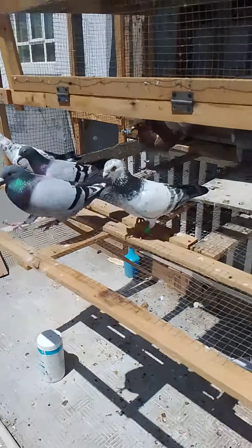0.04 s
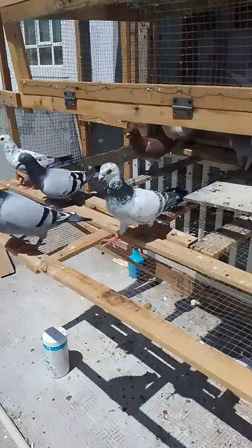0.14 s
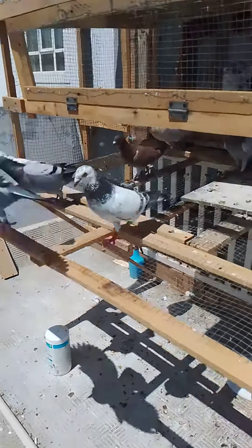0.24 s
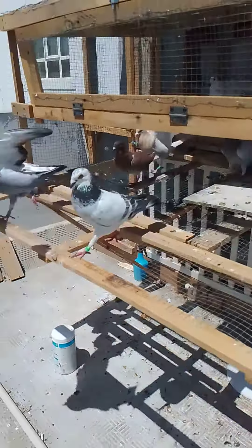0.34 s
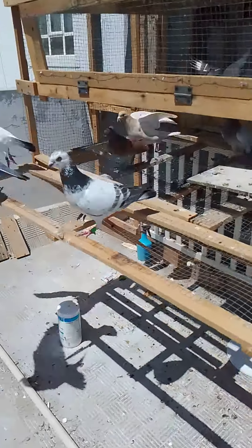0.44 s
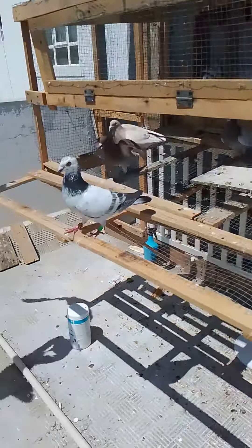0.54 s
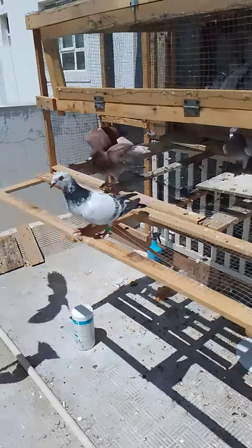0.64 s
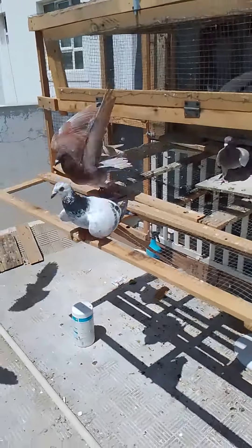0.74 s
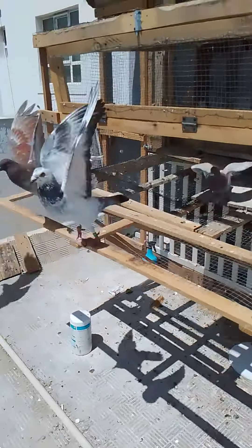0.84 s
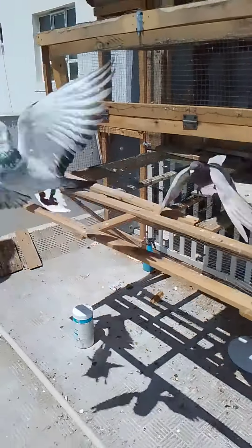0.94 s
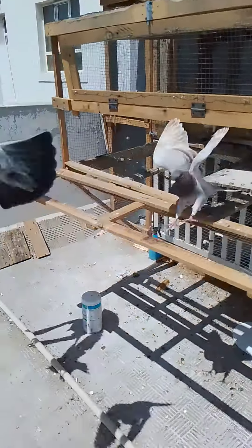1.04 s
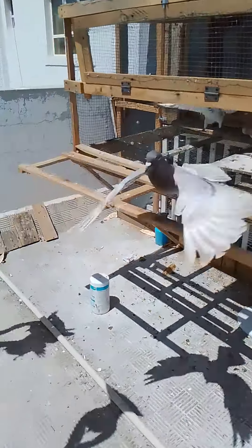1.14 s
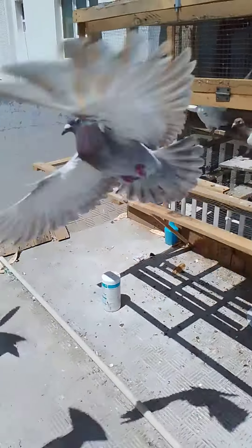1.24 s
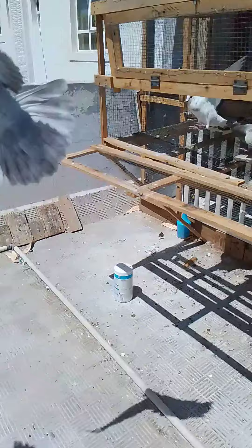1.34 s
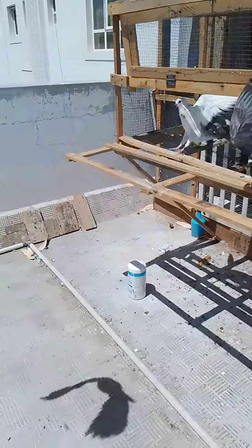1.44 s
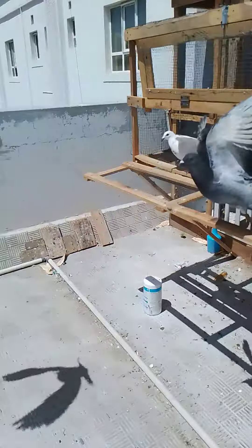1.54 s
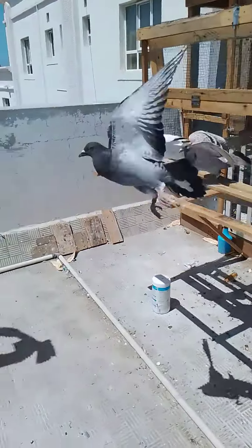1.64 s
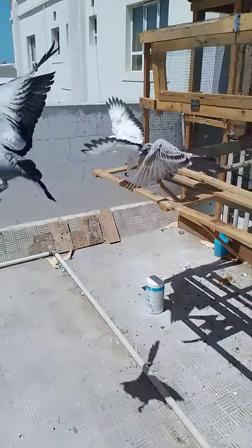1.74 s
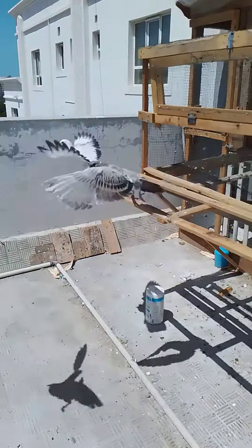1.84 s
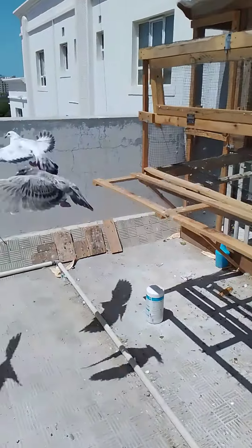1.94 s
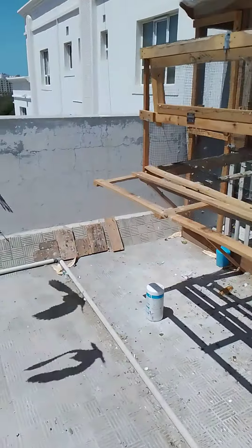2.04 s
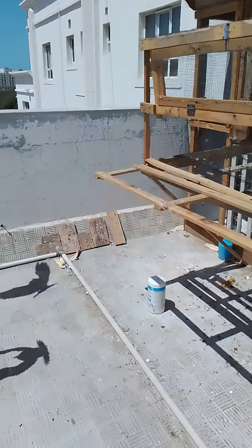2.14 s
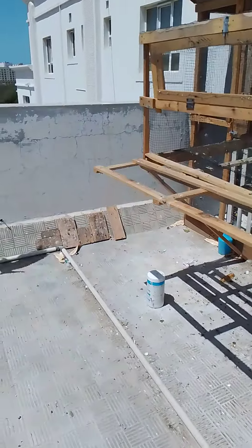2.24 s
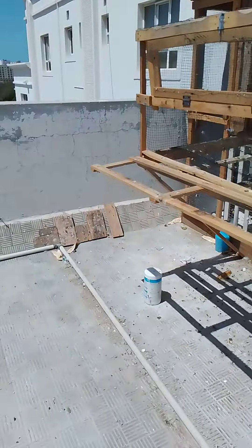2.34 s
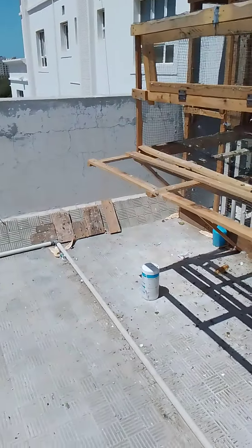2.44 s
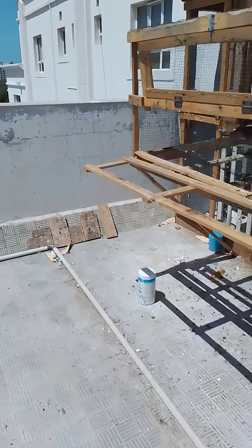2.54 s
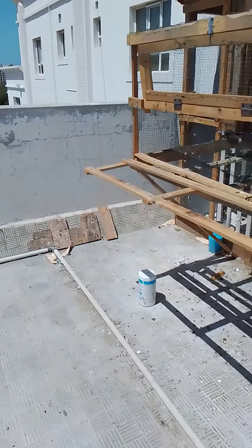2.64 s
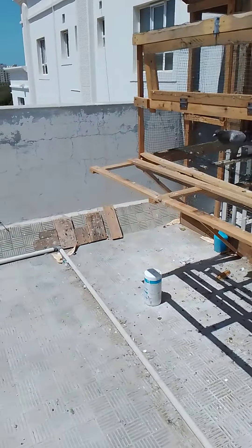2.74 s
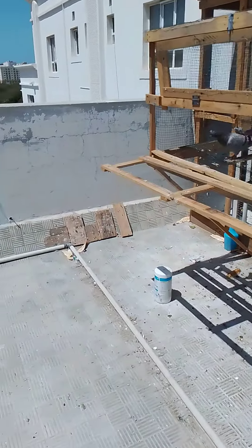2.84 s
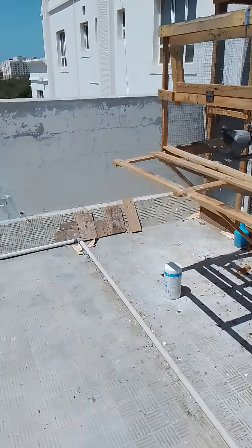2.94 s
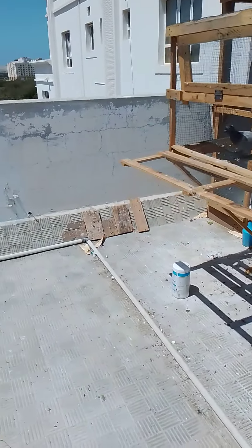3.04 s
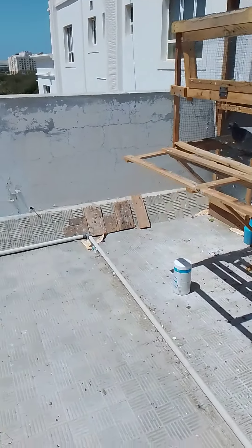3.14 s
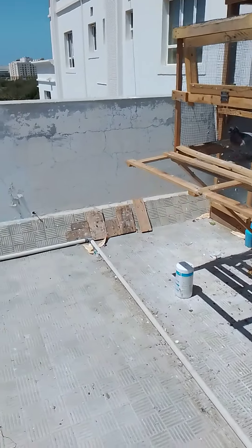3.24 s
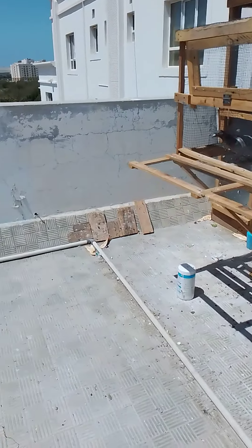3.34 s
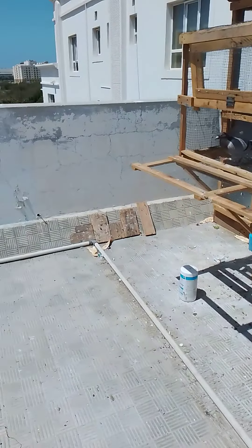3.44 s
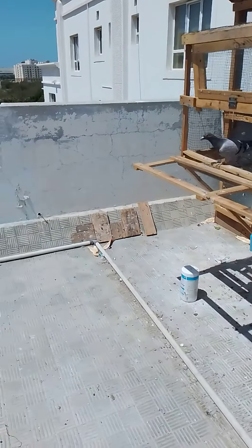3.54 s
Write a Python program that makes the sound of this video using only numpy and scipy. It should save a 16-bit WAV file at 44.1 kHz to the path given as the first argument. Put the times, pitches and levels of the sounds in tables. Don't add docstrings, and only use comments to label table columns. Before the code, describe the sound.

Wing flaps of pigeons taking off, crackling feather snaps over a swelling airy rush that fades

```python
import sys
import numpy as np
from scipy import signal
from scipy.fft import rfft, irfft
from scipy.io import wavfile

SR = 44100
rng = np.random.default_rng(int(sys.argv[2]) if len(sys.argv) > 2 else 0)


def int16_out(signal):
    q = np.round(np.clip(np.atleast_2d(signal).T, -1, 1) * 32767)
    wavfile.write(sys.argv[1], SR, q.astype(np.int16))


def volts_from_db(level):
    exponent = np.asarray(level, float) / 20
    return 10 ** exponent


N = 156555

# [Hz, dB per Hz]
RUMBLE_SPECTRUM = [(12, -29), (20, -34), (59, -6.5), (76, -6), (122, -10), (156, -16.5), (165, -83),
                   (210, -66), (360, -120)]
# [Hz, dB per Hz]
TOWN_SPECTRUM = [(100, -75), (170, -9.5), (312, 0), (596, -9.5), (749, -1.5), (1940, -1.5), (4300, -16),
                 (4800, -28), (16000, -44)]
# t/s, peak level/dB, f/Hz
FEATHER_FLICKS = [(0.0169, -36, 8230), (0.4668, -29, 9180), (0.6744, -40, 10300), (0.7367, -28, 8880),
                  (0.8989, -38, 10200), (1.132, -24.5, 8300), (1.2094, -26.5, 9370), (1.343, -29, 8050),
                  (1.377, -28, 10000), (1.496, -27, 8240), (1.7686, -33, 9210), (2.177, -39, 8580),
                  (2.5344, -31, 9060), (2.5716, -39, 7600), (2.7095, -29, 8290), (3.0284, -61, 8660)]
# t/s, peak level/dB, f/Hz
FEATHER_SLAPS = [(0.572, -20, 2570), (0.588, -20, 1760), (1.001, -25, 2600), (1.139, -18, 2550),
                 (1.214, -14.5, 2000), (1.224, -17, 1890), (1.267, -34, 1070), (1.389, -20, 1320),
                 (1.417, -14.5, 2650), (1.429, -14, 1040), (1.488, -21, 1900), (1.518, -18, 2000),
                 (1.632, -24, 1280), (1.661, -19, 1250), (1.799, -17, 2110), (1.847, -19.5, 1840),
                 (2.009, -22, 1790), (2.099, -34, 2230)]
# t/s, peak level/dB, f/Hz, length/s
THROBS = [(0.457, -28, 282, 0.057), (0.519, -5.5, 370, 0.01), (0.658, -18.5, 335, 0.017),
          (0.797, -16.5, 330, 0.012), (0.847, -15, 370, 0.01), (0.9, -20.5, 304, 0.048),
          (0.965, -18, 307, 0.022), (1.235, -19.5, 422, 0.034), (1.419, -22, 439, 0.04),
          (1.554, -22, 553, 0.014), (1.68, -16.5, 398, 0.012), (1.741, -21, 337, 0.021),
          (1.841, -20.5, 353.6, 0.088), (1.918, -27.5, 390, 0.042), (2.079, -26.5, 322, 0.2),
          (2.167, -27.5, 416, 0.085), (2.252, -28.5, 450, 0.087), (2.291, -21.5, 343, 0.048),
          (2.377, -19.5, 416, 0.027), (2.504, -20, 307, 0.03), (2.547, -25, 320, 0.045),
          (2.801, -27.5, 366, 0.075), (3.135, -23.5, 335, 0.075), (3.163, -24.5, 340, 0.029)]
# t/s, peak level/dB, f/Hz
DOWNSTROKES = [(0.743, -29, 1094), (0.893, -16.5, 1268), (1.136, -40, 1170), (1.21, -33, 1150),
               (1.27, -25, 1090), (1.321, -21, 867), (1.346, -22, 620), (1.39, -20, 1270),
               (1.419, -21.5, 1107), (1.452, -17.5, 591), (1.471, -22, 1217), (1.507, -17.5, 1014),
               (1.618, -20.5, 967), (1.654, -26, 1220), (1.89, -23.5, 1170)]
# t/s, level/dB, nearness (bass gain)/dB
FLOCK_PATH = [(0.0, -41.5, -0.5), (0.24, -38.5, -5), (0.6, -30.5, 1), (1.4, -29.5, -0.5), (1.5, -29, 0),
              (2.39, -37, 1.5), (2.51, -39.5, 3.5), (2.87, -40.5, 1.5), (3.07, -39, 2), (3.29, -41.5, 6),
              (3.55, -47.5, 8)]
# [Hz, dB per Hz]
WING_SPECTRUM = [(100, -75), (170, -7), (295, 1), (749, -6.5), (996, -1), (1400, -4), (2840, -4),
                 (7480, -22.5), (16000, -28)]
# t/s, peak level/dB, ring f/Hz, brightness/dB, tail t60/s
WING_CLAPS = [(0.066, -29, 1860, -22, 0.24), (0.164, -24, 3220, -21, 0.19),
              (0.2074, -15.5, 3240, -40, 0.15), (0.2737, -28, 3200, -36, 0.073),
              (0.2797, -17.5, 4000, -25, 0.059), (0.3494, -20, 980, -50, 0.12),
              (0.4401, -17, 2800, -30.5, 0.067), (0.5104, -5, 2760, -10, 0.18),
              (0.5214, -15, 2060, -33, 0.17), (0.6185, -15.5, 1040, -30, 0.036),
              (0.6255, -20, 2920, -11, 0.089), (0.629, -11, 2900, -30, 0.046), (0.7938, -8, 3860, 2, 0.054),
              (0.7985, -14, 3140, -11, 0.18), (0.849, -21.5, 2160, -24, 0.25),
              (0.8892, -15, 1330, -41, 0.074), (0.9014, -14, 2050, -34, 0.15),
              (0.923, -12.5, 2330, -11, 0.068), (0.9657, -12, 1950, -24, 0.23),
              (0.9889, -15, 2950, -17, 0.078), (1.107, -15, 1980, -24, 0.088),
              (1.1613, -17.5, 1900, -36, 0.076), (1.2414, -14.5, 2750, -40, 0.21),
              (1.3206, -19, 1870, -39, 0.17),
              (1.4493, -15, 2730, -1, 0.077), (1.5547, -13.5, 2880, -6, 0.3),
                 (1.584, -14.5, 1010, -14, 0.039), (1.6257, -15.5, 930, -17, 0.22),
                 (1.893, -14, 1570, -22, 0.23), (1.928, -14, 2050, -12, 0.051),
                 (1.986, -16.5, 2300, -11, 0.33), (2.0493, -16, 2880, -23, .04),
                 (2.0805, -15, 2780, -51, 0.11), (2.2843, -15, 3680, -5, 0.16),
                 (2.3892, -9.5, 3830, -7, 0.1), (2.394, -9, 2200, -16, 0.2),
                 (2.4463, -22, 1550, -52, 0.087), (2.511, -8.5, 2770, -17, 0.12),
                 (2.7162, -12.5, 2460, -18, 0.14), (2.829, -22, 1210, -18, 0.36),
                 (2.9422, -16.5, 1570, -16, 0.2), (3.0564, -27, 1480, -18, 0.21),
                 (3.18, -30, 837, -30, 0.068), (3.2195, -19, 2450, -17, 0.12),
                 (3.254, -16.5, 1680, -25, 0.13), (3.44, -32, 3280, -18, 0.08)]
# t/s, peak level/dB, ring f/Hz, brightness/dB, tail t60/s
WING_CRACKS = [
    (0.4137, -8.5, 1650, -26, 0.19),
    (0.5245, -9, 960, -32, 0.041),
    (0.9475, -8.5, 1070, -36, 0.06),
    (0.9807, -8.5, 2980, -24, 0.06),
    (1.4635, -7.5, 3160, 9, 0.065),
    (1.684, -10, 1110, -20, 0.072),
    (1.7731, -13, 2960, -19, 0.36),
    (2.0754, -11.5, 2920, -50, .06),
    (2.2362, -15, 2800, -27, 0.1),
    (2.713, -7.5, 1400, -30, 0.027),
]
# [Hz, dB per Hz]
CLAP_SPECTRUM = [(100, -31), (170, -25), (585, -8), (872, -1), (1350, -3.5), (1760, -3.5), (2780, 0),
                 (9040, -20.5), (16000, -30.5)]
# delay t/s, level/dB
LOFT_ECHOES = [
    (.0041, -11.5),
    (0.014, -9),
    (0.03, -33),
]
# f/Hz, gain/dB
MIC_RIPPLE = [(3300, -2), (4350, -2), (4700, -5.5), (6000, -6), (7500, -11), (9500, -4.5), (13000, -16.5),
              (15500, -7)]


def rms_one(x):
    return x / np.sqrt(np.mean(x ** 2) + 1e-20)


def colour(x, points):
    size = 8192
    f = np.maximum(np.arange(size // 2 + 1) * SR / size, 1)
    hz, db = np.transpose(points)
    level = np.interp(np.log(f), np.log(hz), db)
    cepstrum = irfft(np.log(volts_from_db(level)))
    cepstrum[1:size // 2] *= 2
    cepstrum[size // 2 + 1:] = 0
    return signal.fftconvolve(x, irfft(np.exp(rfft(cepstrum))))[:len(x)]


def drift(rate):
    r = np.exp(-80 * np.pi * rate / SR)
    slow = signal.lfilter([1], [1, -2 * r, r * r], rng.standard_normal(N // 40 + 2002))[2000:]
    return np.interp(np.arange(N) / 40, np.arange(len(slow)), rms_one(slow - slow.mean()))


def peak(x, hz, width_hz):
    r = np.exp(-np.pi * width_hz / SR)
    feedback = [1, -2 * r * np.cos(2 * np.pi * hz / SR), r * r]
    return signal.lfilter([(1 - r * r) / 2, 0, (r * r - 1) / 2], feedback, x)


def add(out, s, x):
    i = int(s * SR)
    out[i:i + len(x)] += x[:len(out) - i]


def patchy(spectrum, patchy_db, beat_db=0):
    edges = 150 * 2 ** np.arange(0, 7.1, .5)
    white = rng.standard_normal((2, N))
    out = np.zeros(N)
    for k, (lo, hi) in enumerate(zip(edges, edges[1:])):
        band = signal.butter(2, [lo, hi], "band", fs=SR, output="sos")
        beat_share = -0.5 + 2.2 * (k / 13) ** 2
        gain_db = patchy_db * drift(15.2) + beat_db * beat_share
        out += volts_from_db(gain_db) * signal.sosfilt(band, white[k % 2])
    return rms_one(colour(out, spectrum))


def rumble(flock_db):
    level_db = -56.5 + 0.58 * (flock_db - flock_db.mean()) + 1.6 * drift(16)
    return rms_one(colour(rng.standard_normal(N), RUMBLE_SPECTRUM)) * volts_from_db(level_db)


def town_hum():
    return volts_from_db(-44) * patchy(TOWN_SPECTRUM, patchy_db=2.0)


def squeak():
    start_s, level_db, hz, t60_s, rise_s = 1.734, -15, 3560, .06, .003
    out, t = np.zeros(N), np.arange(SR // 8) / SR
    tone = np.sin(2 * np.pi * hz * t) + .8 * np.sin(2 * np.pi * .92 * hz * t)
    add(out, start_s, volts_from_db(level_db - 60 * t / t60_s) * (1 - np.exp(-t / rise_s)) * tone)
    return out


def feather_bursts(rows, gain_db, t60_s, q):
    out, t = np.zeros(N), np.arange(SR // 10) / SR
    for s, db, hz in rows:
        burst = rng.standard_normal(len(t)) * volts_from_db(-60 * t / t60_s)
        x = colour(peak(burst, hz, hz / q), CLAP_SPECTRUM)
        add(out, s, volts_from_db(db + gain_db) * x / np.abs(x).max())
    return out


def throbs():
    level_db, rise_s, roughness, sag = -7.5, 0.00067, 0.58, 0.207
    out, t = np.zeros(N), np.arange(SR // 4) / SR
    for s, db, hz, length in THROBS:
        tone = np.sin(2 * np.pi * hz * np.cumsum(1 - sag * t / (t + length)) / SR)
        air = rng.standard_normal(len(t))
        breath = rms_one(peak(peak(air, hz, 190), hz, 190) - 0.22 * peak(air, 2 * hz, 400))
        shape = (1 - np.exp(-t / rise_s)) * np.exp(-(t / length) ** 2)
        add(out, s, volts_from_db(db + level_db) * shape * ((1 - roughness) * tone + roughness * breath))
    return out


def downstrokes():
    swell_s, level_db, q, sag = 0.0075, -10.5, 17, .16
    whistle_db, broad_db = 1, -5.5
    out, t = np.zeros(N), np.arange(SR // 8) / SR
    for s, db, hz in DOWNSTROKES:
        air = rng.standard_normal(len(t))
        pitch = 1 + sag * (.5 - t / (t + 2 * swell_s))
        whistle = np.sin(2 * np.pi * hz * np.cumsum(pitch) / SR)
        narrow = rms_one(peak(air, hz, hz / q))
        broad = rms_one(colour(air, CLAP_SPECTRUM))
        x = volts_from_db(whistle_db) * whistle + 0.73 * narrow + volts_from_db(broad_db) * broad
        swell = np.e * t / swell_s * np.exp(-t / swell_s)
        add(out, s, volts_from_db(db + level_db) * swell * x)
    return out


def rustles(beat):
    per_s, beat_db, width_hz = 700, 4, 90
    struck = rng.random(N) < per_s * volts_from_db(beat_db * beat) / SR
    force = volts_from_db(2.4 * np.minimum(rng.exponential(1, N), 3.5))
    ticks = struck * force * rng.choice([-1, 1], N)
    patch = rng.integers(0, 30, N)
    out = np.zeros(N)
    for k, hz in enumerate(np.geomspace(500, 5500, 30)):
        ring = peak(ticks * (patch == k) + 1e-18, hz, width_hz * np.sqrt(hz / 1000))
        out += rms_one(ring) * np.sqrt(hz)
    return rms_one(colour(out, WING_SPECTRUM))


def rush(flock_db, near_db):
    beats_per_s, low_hz, high_hz, treble_follows = 17, 620, 4670, 0.13
    beat = drift(beats_per_s)
    rustle = volts_from_db(-2) * rustles(beat)
    air = patchy(WING_SPECTRUM, patchy_db=2.5, beat_db=0.8 * beat) + rustle
    low = signal.sosfilt(signal.butter(2, low_hz, fs=SR, output="sos"), air)
    high = signal.sosfilt(signal.butter(2, high_hz, "high", fs=SR, output="sos"), air)
    middle = air - low - high
    distance_db = treble_follows * (flock_db - flock_db.max())
    return volts_from_db(flock_db) * (middle + low * volts_from_db(near_db) + high * volts_from_db(distance_db))


def feather_snaps(t, air, tail_s, puff_db, spread):
    spread_s, loss_db, scatter_db, first_size = .01, 30.5, 1.5, 1.2
    when, size = rng.random(8), rng.standard_normal(8)
    when[0], size[0] = 0, first_size
    snaps = np.zeros(len(t))
    at = (when * spread * spread_s * SR).astype(int)
    np.add.at(snaps, at, volts_from_db(scatter_db * size - loss_db * when) * np.sign(air[:8]))
    for lag, echo_db in LOFT_ECHOES:
        gain = volts_from_db(echo_db + puff_db - 60 * lag / tail_s + 12)
        add(snaps, lag, gain * snaps * (t < spread_s))
    return snaps


def claps(rows, puff_db, spread):
    puff_level_db, puff_rise_s, grain_spread_db = -19, 0.0006, 4
    ring_q, ring_db, overtone_db, broad_db = 3.8, -6.5, 2, -2.5
    treble_db, treble_hz, treble_t60_s = 21, 3700, 0.42
    out, t = np.zeros(N), np.arange(SR // 5) / SR
    high = signal.butter(2, treble_hz, "high", fs=SR, output="sos")
    for s, db, hz, bright_db, tail_s in rows:
        air = rng.standard_normal(len(t))
        snaps = feather_snaps(t, air, tail_s, puff_db, spread)
        grain_db = grain_spread_db * np.repeat(rng.standard_normal(len(t) // 60), 60)
        fade_db = puff_level_db + puff_db + grain_db - 60 * t / tail_s
        x = snaps + volts_from_db(fade_db) * (1 - np.exp(-t / puff_rise_s)) * air
        other = hz * rng.uniform(1.5, 2.4) ** np.sign(2500 - hz)
        rings = peak(x, hz, hz / ring_q) - volts_from_db(overtone_db) * peak(x, other, other / ring_q)
        treble = volts_from_db(bright_db + treble_db - 60 * t / treble_t60_s) * signal.sosfilt(high, x)
        x = volts_from_db(broad_db) * x + volts_from_db(ring_db) * ring_q * rings + treble
        x = colour(x, CLAP_SPECTRUM)
        add(out, s, volts_from_db(db) * x / np.abs(x).max())
    return out


def scene():
    s, *controls = np.transpose(FLOCK_PATH)
    flock_db, near_db = (np.interp(np.arange(N) / SR, s, c) for c in controls)
    birds = town_hum() + squeak()
    birds += feather_bursts(FEATHER_FLICKS, gain_db=4.5, t60_s=0.093, q=0.68)
    birds += feather_bursts(FEATHER_SLAPS, gain_db=-3, t60_s=0.053, q=4.0)
    birds += throbs() + downstrokes() + rush(flock_db, near_db)
    birds += claps(WING_CRACKS, puff_db=-4, spread=0.25)
    birds += claps(WING_CLAPS, puff_db=0, spread=1.0)
    low_cut = signal.butter(8, 211.6, "high", fs=SR, output="sos")
    return (signal.sosfilt(low_cut, birds) + rumble(flock_db))[None]


def low_pass(x):
    return signal.sosfilt(signal.butter(12, 16940, fs=SR, output="sos"), x)


def record(dry):
    limit, top_hz = .7, 16800
    x = limit * np.tanh(colour(dry[0], MIC_RIPPLE)[None] / limit)
    x = signal.sosfilt(signal.cheby2(12, 70, top_hz, fs=SR, output="sos"), x)
    return low_pass(x)


dry = scene()
out = record(dry)
int16_out(out)
```